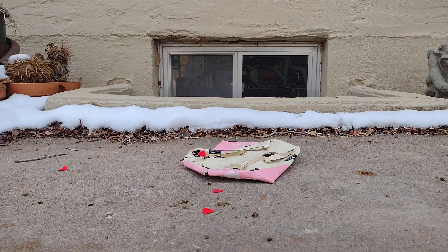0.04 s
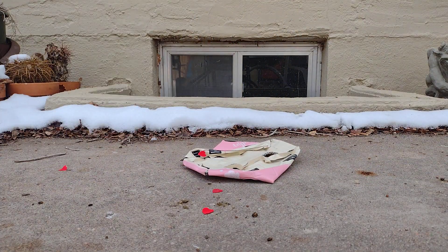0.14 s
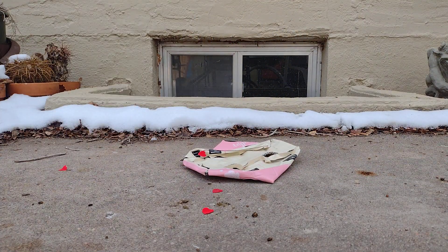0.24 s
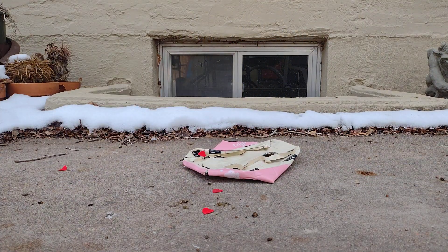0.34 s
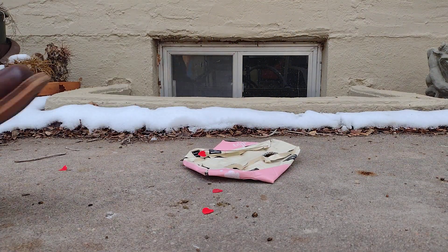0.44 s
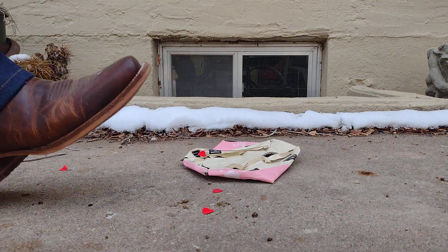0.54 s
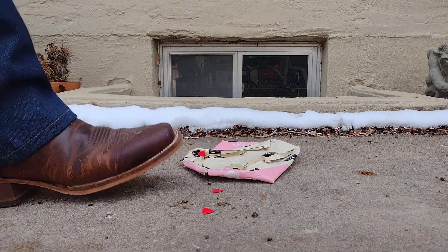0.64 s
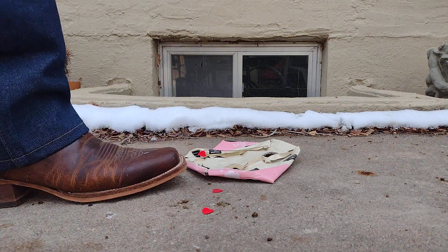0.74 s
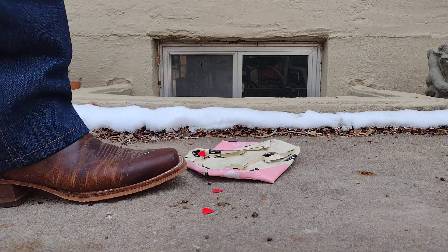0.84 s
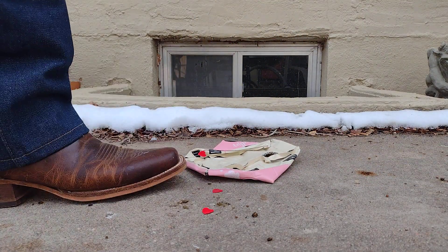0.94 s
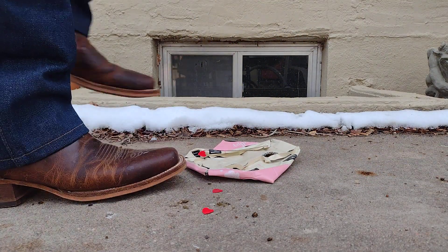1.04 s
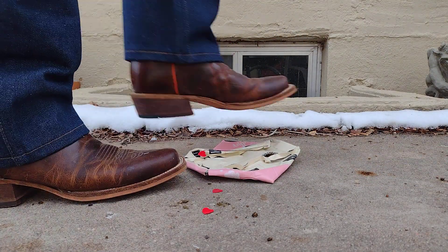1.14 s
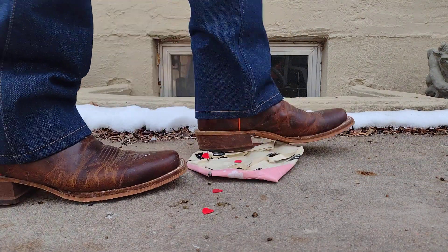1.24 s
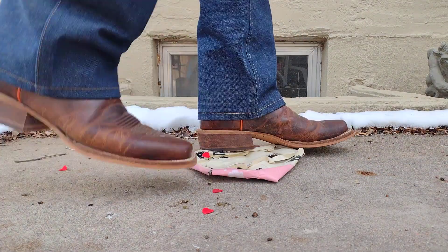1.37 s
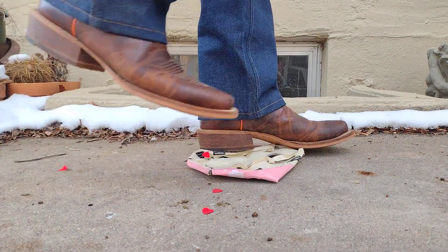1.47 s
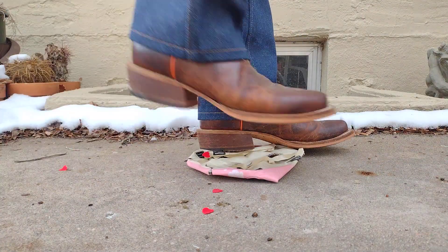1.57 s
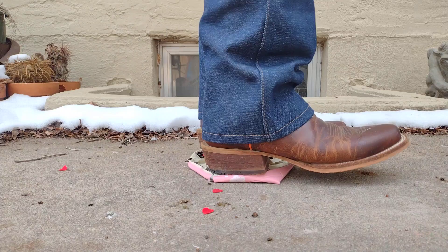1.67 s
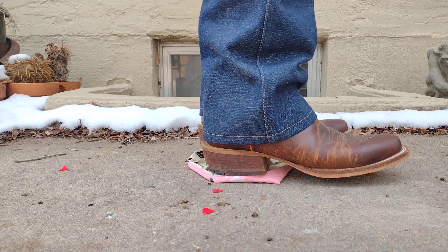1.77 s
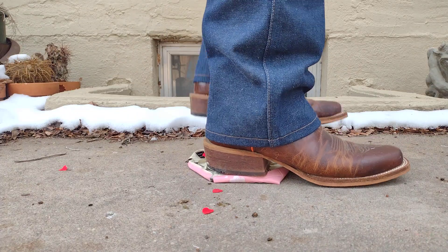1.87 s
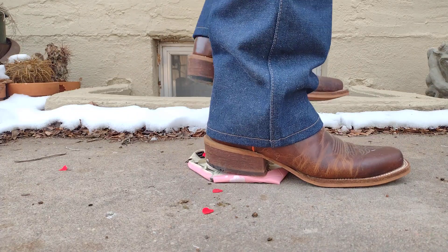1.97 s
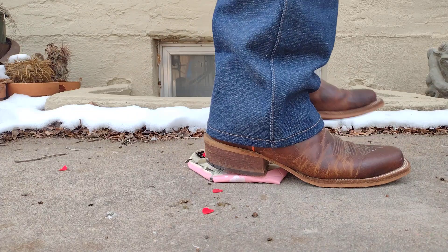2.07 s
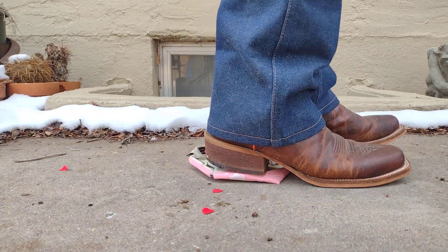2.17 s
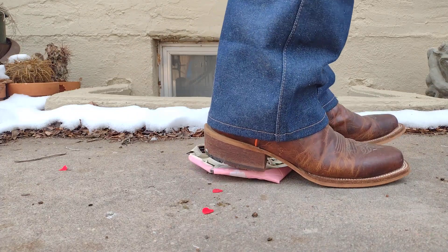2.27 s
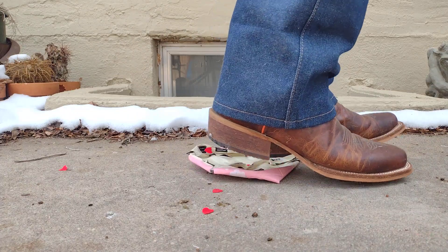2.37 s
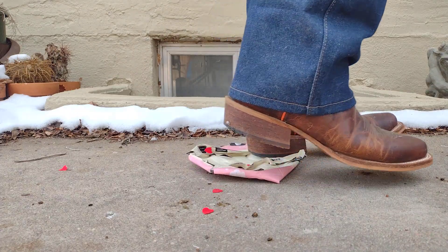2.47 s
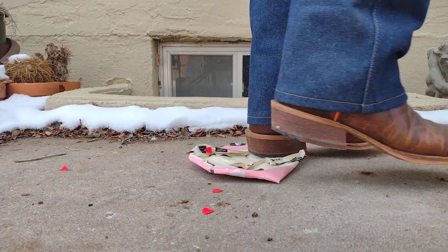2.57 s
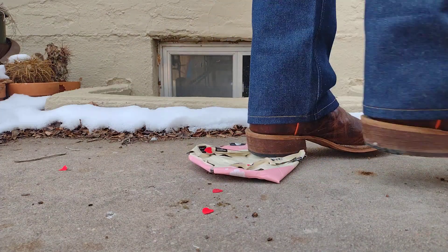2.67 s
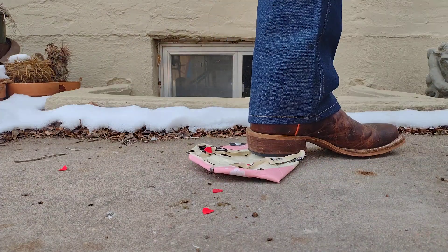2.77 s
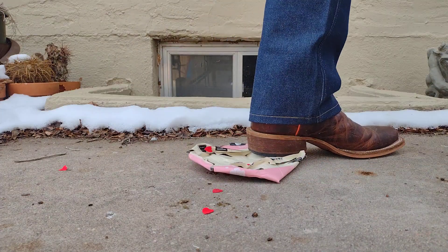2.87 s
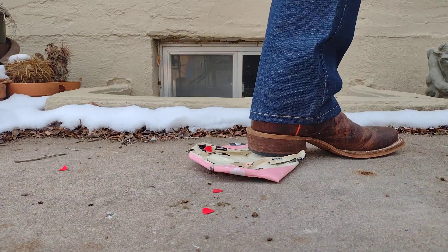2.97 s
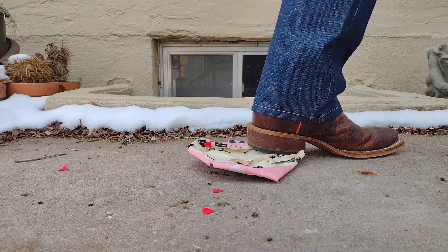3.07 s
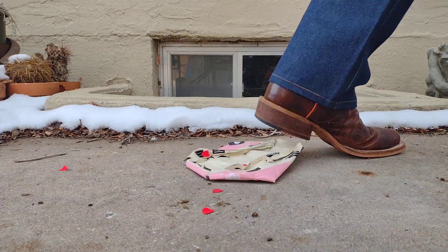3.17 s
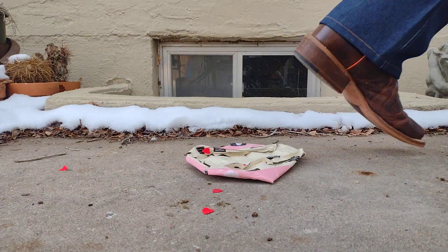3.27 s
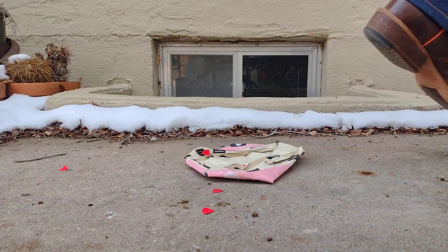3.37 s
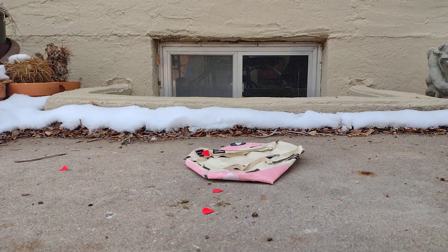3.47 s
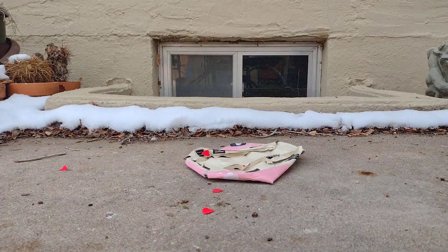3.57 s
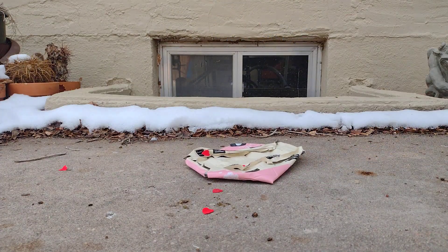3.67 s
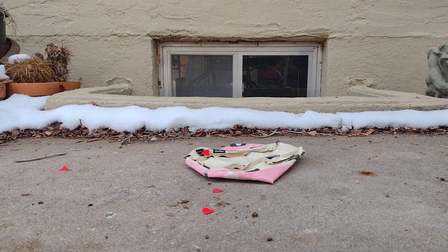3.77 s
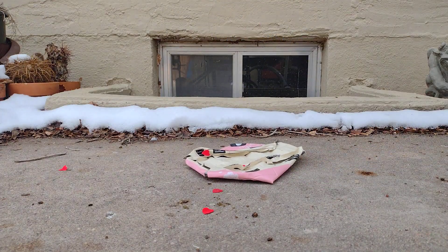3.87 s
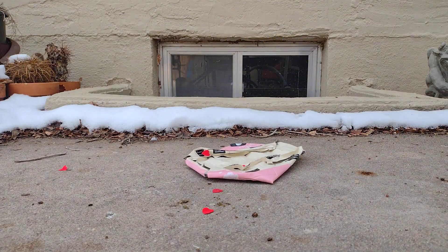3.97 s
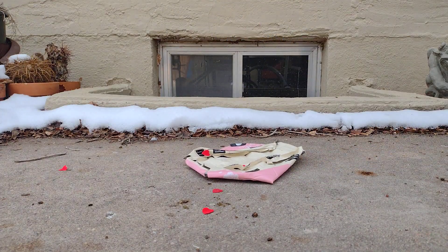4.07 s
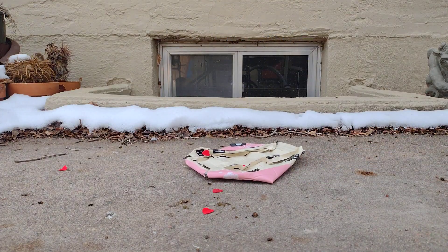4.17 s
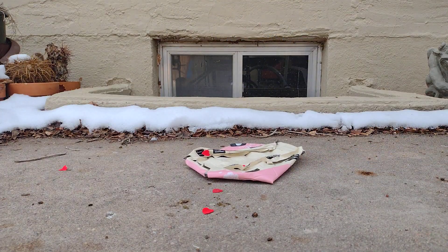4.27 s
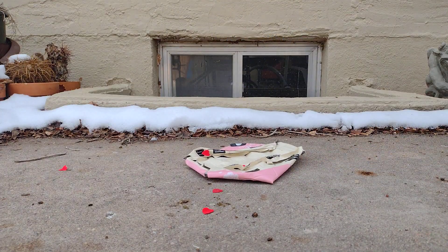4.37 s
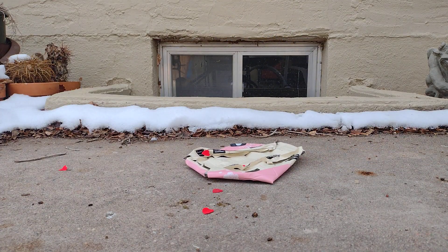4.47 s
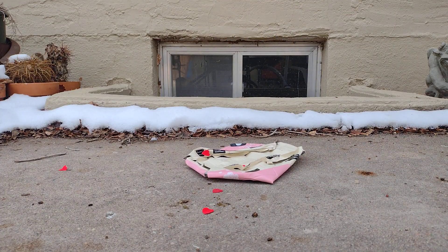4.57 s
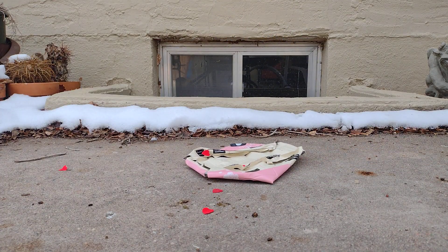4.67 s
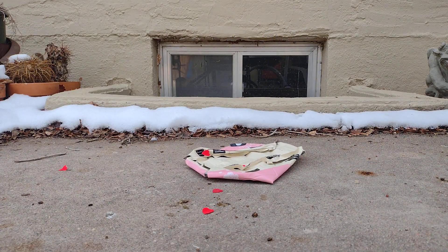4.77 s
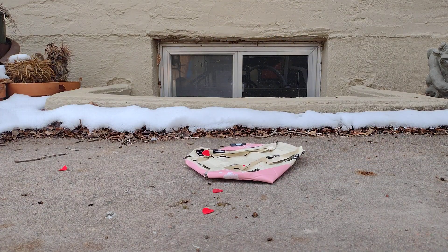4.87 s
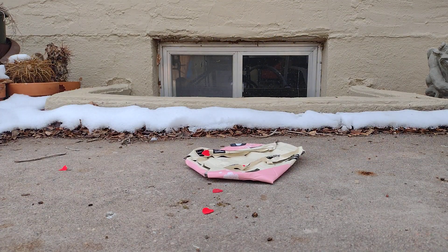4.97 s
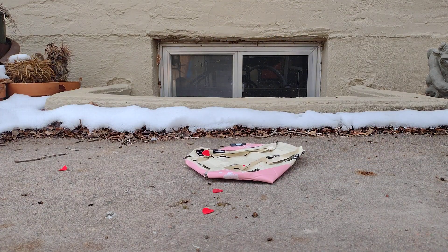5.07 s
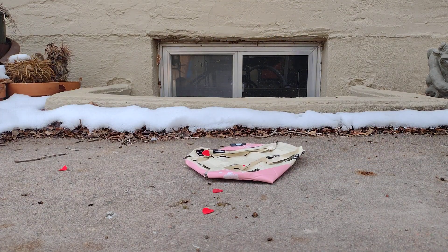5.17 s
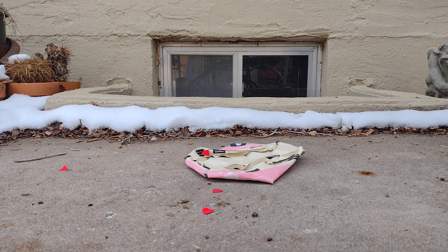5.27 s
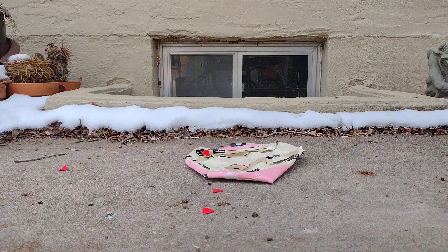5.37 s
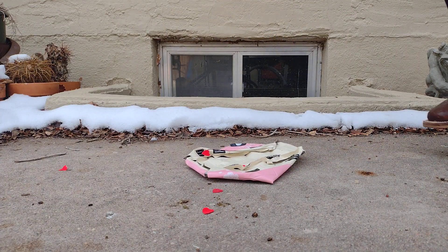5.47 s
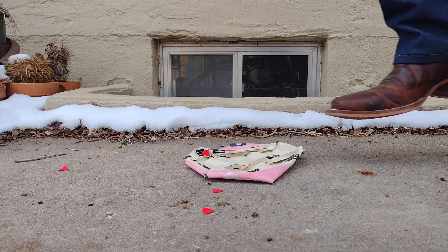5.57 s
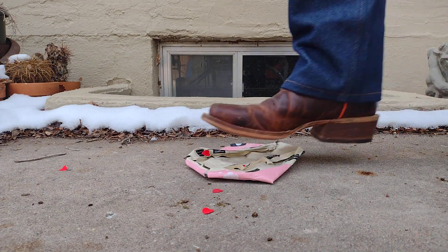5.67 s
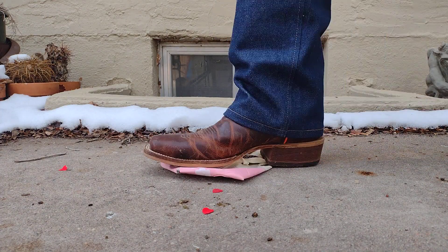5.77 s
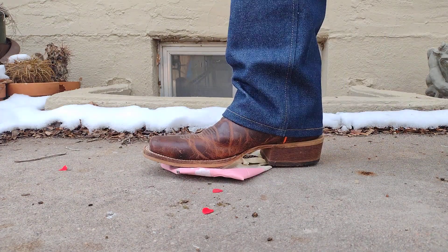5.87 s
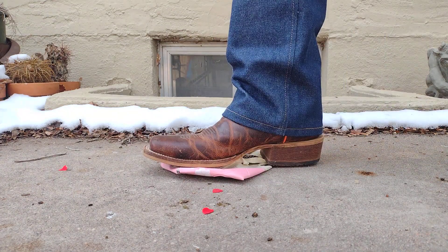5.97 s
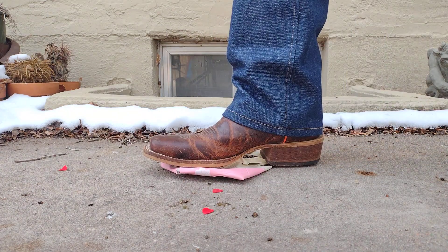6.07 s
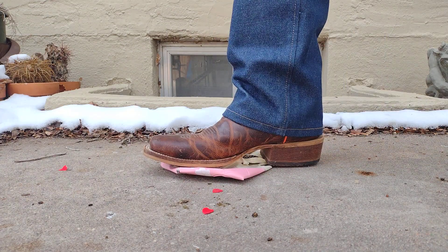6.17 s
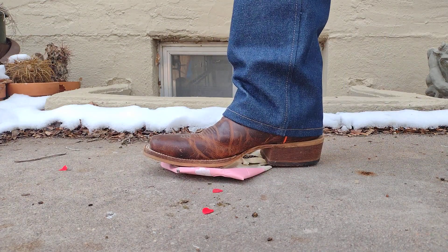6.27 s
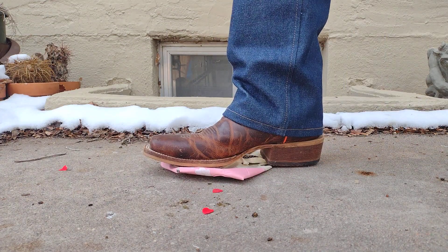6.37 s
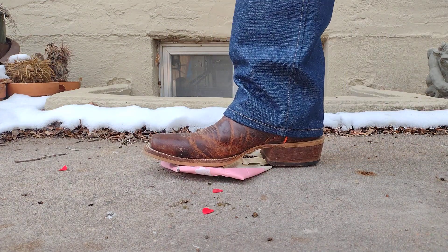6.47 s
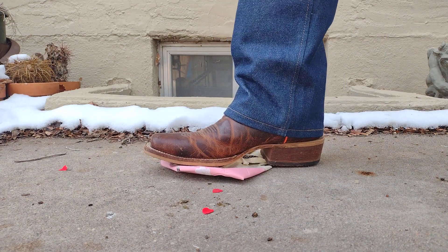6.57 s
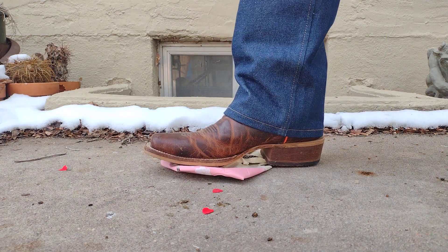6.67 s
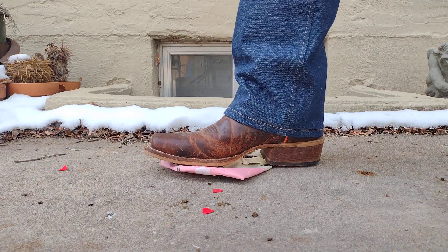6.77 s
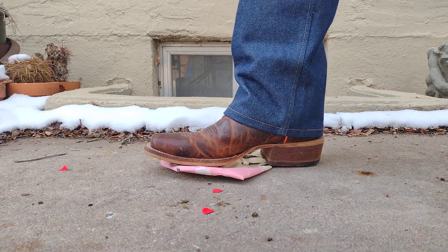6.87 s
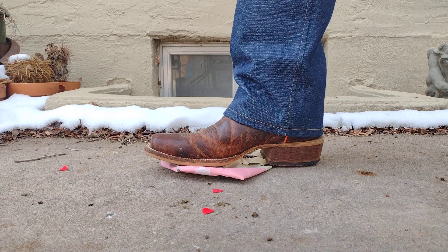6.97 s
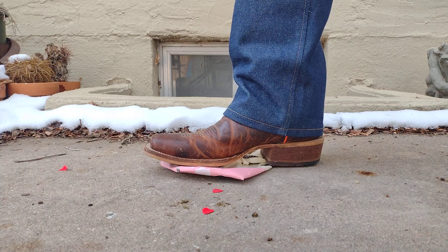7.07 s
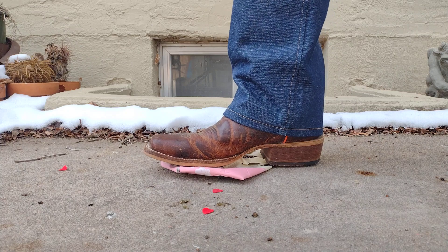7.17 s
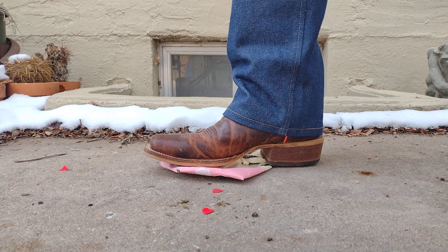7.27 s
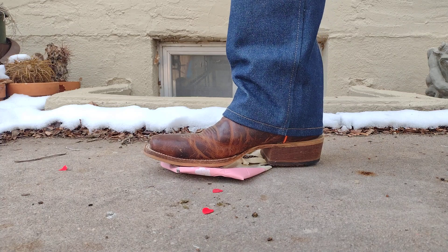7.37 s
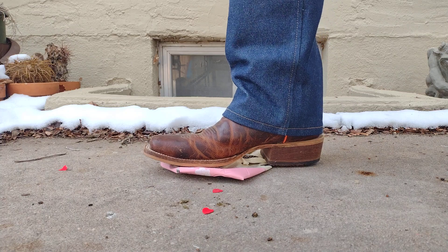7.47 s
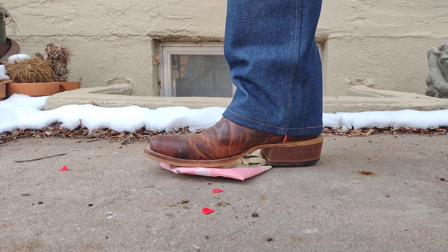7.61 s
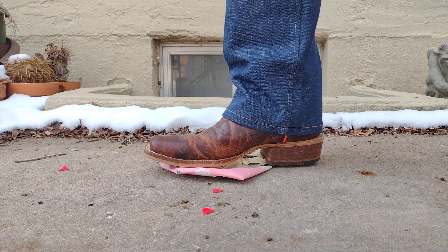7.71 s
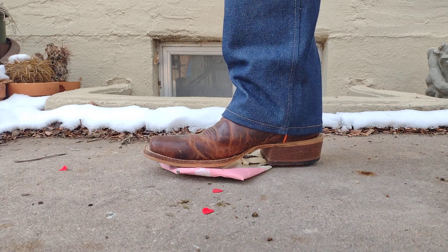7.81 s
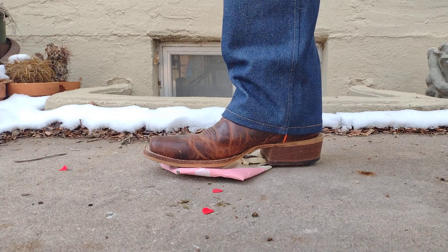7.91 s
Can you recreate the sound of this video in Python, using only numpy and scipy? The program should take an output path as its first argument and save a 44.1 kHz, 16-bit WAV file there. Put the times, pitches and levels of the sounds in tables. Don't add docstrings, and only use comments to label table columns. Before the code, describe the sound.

A close outdoor scene on concrete beside a house, with a short wall echo. Distant traffic rumble is strongest for the first quarter second, then drops and stays faint, with thin hiss. Light grit ticks open it; a heel thuds at 0.7 s. At 1.3 s a boot stamps thin tin: a dense, very loud cluster of metallic clacks and crunches lasting about a tenth of a second. Another sharp clack hits at 1.75 s, with small creaks and snaps to 2.0, and a third crunching stamp at 2.2. From 3.15 to 3.7 s the freed sheet rattles and springs in quick, lighter clacks, fading by 3.85. Quiet scrapes and soft distant steps occur around 4.1, 4.6 and 5.3. At 5.83 s a final heavy stamp thumps and crushes the tin, creaking briefly. A dull heel tap comes at 6.34, then only sparse grit ticks until nearly 8 s.

```python
import sys
import numpy as np
from scipy import signal
from scipy.fft import rfft, irfft, next_fast_len
from scipy.io import wavfile
from scipy.ndimage import uniform_filter1d, map_coordinates

SR = 44100
rng = np.random.default_rng(int(sys.argv[2]) if len(sys.argv) > 2 else 0)


def boost(x):
    u = np.asarray(x, float) / 20
    return 10 ** u


def store_wav(level_fs):
    pcm = np.round(np.clip(np.atleast_2d(level_fs), -1, 1) * 32767)
    wavfile.write(sys.argv[1], SR, pcm.T.astype(np.int16))


N = 350286


def unit(x):
    return x / np.sqrt(np.mean(x ** 2) + 1e-20)


def along(points, hz):
    f, v = np.transpose(points)
    return np.interp(np.log(hz + 1), np.log(f + 1), v)


def filtered(x, response):
    m = next_fast_len(x.shape[-1] + 2048)
    return irfft(rfft(x, m) * response(np.fft.rfftfreq(m, 1 / SR)), m)[..., :x.shape[-1]]


def resonance(f, hz, width_hz):
    return 1j * f * width_hz / (hz * hz - f * f + 1j * f * width_hz)


def wobble(rate):
    knots = rng.standard_normal(int(N * rate / SR) + 4)
    return map_coordinates(knots, [np.arange(N) * rate / SR])


def spread(pair, alike):
    def mid_side(hz):
        turn = np.arccos(np.clip(along(alike, hz), -1, 1)) / 2
        return np.array([np.cos(turn), np.sin(turn)])

    mid, side = filtered(pair, mid_side)
    return np.array([mid + side, mid - side])


def coloured(length, spectrum):
    white = rng.standard_normal((2, length))
    return unit(filtered(white, lambda f: boost(along(spectrum, f))))


def add(out, s, sound):
    out[:, round(s * SR):][:, :sound.shape[1]] += sound


# (time [s], rumble level [dB])
STREET_LEVEL = [(0, -41.5), (.18, -41), (.26, -52.5), (0.8, -51.5), (1.7, -54.5), (2.1, -58.5), (2.4, -57),
                (2.8, -61), (3.2, -53), (3.8, -57.5), (4.3, -63), (5.0, -62.5), (5.4, -59), (6.1, -58.5),
                (6.35, -61), (6.6, -63.5), (7.94, -65)]
# (frequency [Hz], density [dB per Hz])
RUMBLE_SPECTRUM = [(12, -60), (37, -18), (114, 1.5), (220, -4.5), (370, -10), (450, -16), (900, -24),
                   (1500, -76)]
# (frequency [Hz], density [dB per Hz])
TYRE_SPECTRUM = [(250, -30.5), (400, -6), (800, -8.5), (1300, -11), (1700, -18), (2600, -28), (6000, -60)]
# (frequency [Hz], density [dB per Hz])
HISS_SPECTRUM = [(590, -32.5), (1000, -11.5), (1510, -31), (1610, -7), (3370, -2.5), (4210, -6),
                 (15100, -16.5), (16300, -27.5)]
# (frequency [Hz], left-right likeness [0-1])
FAR_LIKENESS = [(25, 0.4), (70, .75), (180, 1), (550, 0.14), (1650, 0.29), (15000, 0.21)]
# (time [s], delay of the left side [samples])
PASSING_DELAY = [(0, -20), (1.2, -20), (3.5, 16), (7.94, 16)]


def street():
    n = np.arange(N)
    level_db = np.interp(n / SR, *np.transpose(STREET_LEVEL))
    slow_db = uniform_filter1d(level_db, size=SR // 2)
    lumps = boost(2.3 * wobble(10) + 1.0 * wobble(25))
    rumble = boost(level_db) * unit(lumps * coloured(N, RUMBLE_SPECTRUM))
    tyres = boost(0.56 * slow_db - 35) * coloured(N, TYRE_SPECTRUM)
    left, right = spread(rumble + tyres, FAR_LIKENESS)
    delay = np.interp(n / SR, *np.transpose(PASSING_DELAY))
    late_left = np.interp(n - delay, n, left)
    hiss_level = boost(-76 - .1 * (slow_db + 60) + 1.2 * wobble(3))
    return np.array([late_left, right]) + hiss_level * spread(coloured(N, HISS_SPECTRUM), FAR_LIKENESS)


# (frequency [Hz], t60 [s])
WALL_DECAY = [(150, .3), (1500, .28), (5000, .2), (14000, .14)]


def wall(x):
    hz, t, z = signal.stft(rng.standard_normal((2, SR // 2)), SR, nperseg=256)
    decay = boost(-60 * t / along(WALL_DECAY, hz)[:, None])
    tail = signal.istft(z * decay, SR, nperseg=256)[1]
    late = np.pad(x, ((0, 0), (220, 0)))
    return signal.fftconvolve(late, tail / np.linalg.norm(tail[0]), axes=1)[:, :N]


# (time [s], peak level [dB], pitch [Hz], murmur level [dB])
HEEL_THUDS = [(0.6964, -21, 366, -13), (1.318, -25.5, 292, -4), (1.336, -17.5, 520, -16),
              (1.76, -21.5, 200, -9), (1.956, -31, 190, -14), (2.228, -19.5, 200, -8),
              (2.229, -18, 780, -19), (3.0703, -19, 279, -19), (3.26, -46, 450, -6), (3.88, -46, 307, -5.5),
              (3.93, -44.5, 149, -16), (4.585, -50.5, 199, -8.5), (4.652, -41.5, 200, -8.5),
              (5.27, -33, 345, -13), (5.311, -40.5, 166, -11.5), (5.5, -47.5, 160, -6),
              (5.83, -19, 380, -8), (5.848, -14.5, 398, -14), (5.865, -17.5, 600, -14),
              (6.3432, -21, 221.5, -23.5), (7.41, -47.5, 170, -12), (7.451, -49.5, 149, -14)]


def thuds():
    out = np.zeros((2, N + SR))
    lead_s = .02
    t = np.arange(SR // 3) / SR - lead_s

    def dull(f):
        slab = resonance(f, 150, 120) + 1.1 * resonance(f, 360, 280)
        return slab * resonance(f, 150, 450) ** 2

    for s, db, hz, murmur_db in HEEL_THUDS:
        cycles = .3 + .0014 * hz
        push = np.cos(2 * np.pi * hz * t) * np.exp(-(t * hz / cycles) ** 2)
        t60_s = .33 + .005 * db
        fade = (t > 0) * boost(murmur_db - 60 * t / t60_s)
        murmur = filtered(fade * 7.3 * rng.standard_normal(len(t)), dull)
        add(out, s - lead_s, boost(db) * (push + murmur)[None])
    return out[:, :N]


# (frequency [Hz], width [Hz], level [dB])
SHEET_PANELS = [(1283, 210, -16.5), (1700, 32, -1.5), (1820, 11, -6.5), (2470, 51, -7.5), (2620, 28, -11),
                (3070, 130, 3.5), (3710, 130, -10.5), (3960, 190, -12), (4460, 22, -10), (5160, 37, -15.5)]


def panels(hz, width_hz, freed=1.5, facets=.6):
    share = boost(rng.normal(-6.5, 5, len(SHEET_PANELS)))
    facet_hz = np.exp(rng.uniform(np.log(2500), np.log(12000), 7))

    def ring(f):
        total = .5 + freed * resonance(f, hz, width_hz)
        for k, (centre, width, db) in enumerate(SHEET_PANELS):
            total = total + (-1) ** k * share[k] * boost(db) * resonance(f, centre, width + 30)
        return total + facets * sum(resonance(f, centre, 200) for centre in facet_hz)

    return ring


# (frequency [Hz], density [dB per Hz])
BODY_SPECTRUM = [(350, -51), (750, -19), (1000, -11.5), (1300, -6.5), (2100, -8), (3000, -10.5),
                 (4000, -13.5), (5500, -40)]
# (frequency [Hz], density [dB per Hz])
EDGE_SPECTRUM = [(1700, -35.5), (2800, -12), (4500, -4), (8200, -4.5), (10600, -9.5), (14900, -11),
                 (16000, -23.5)]


def tin_noise(length):
    return coloured(length, BODY_SPECTRUM), coloured(length, EDGE_SPECTRUM)


# (frequency [Hz], left-right likeness [0-1])
NEAR_LIKENESS = [(200, 1), (1000, .8), (2000, .55), (4000, .05), (12000, .05)]


def nearby(pair):
    return spread(pair, NEAR_LIKENESS)


# (start [s], held [s], level [dB], brightness [dB], t60 [s])
WEIGHT_CRUSH = [
    (1.313, .018, -18.5, -4.5, .19),
    (1.361, .032, -31.5, 3.5, .2),
    (1.742, .008, -48, -8.5, .03),
    (1.75, .011, -27, 10.5, .023),
    (1.857, .007, -33.5, -6, .13),
    (2.213, .008, -50, 2, .03),
    (2.22, .011, -17, -1.5, .1),
    (5.8255, .042, -17, 0, .069),
    (5.875, .06, -39, -4.5, .15),
]
# (start [s], held [s], level [dB],
# brightness [dB], panel or squeak pitch [Hz])
CREAKS = [(1.765, .04, -36, -9, 2200), (1.77, .07, -37, -19, 1320), (1.96, .03, -56, -10.5, 1394),
          (2.24, .022, -47, -8, 2010), (2.29, .04, -44.5, -6.5, 1830), (3.165, .025, -48, -4.5, 2500),
          (3.248, .023, -38.5, -11, 1390), (3.351, .13, -42, -6, 1830), (3.56, .064, -51, -24, 1500),
          (3.701, .096, -62, -8.5, 1480), (3.85, .028, -54.5, -11.5, 1825), (5.94, .039, -48, -11, 2300),
          (5.36, .11, -72, -18, 3050)]
# (start [s], held [s], level [dB])
SOLE_SCUFFS = [
    (0, .18, -72),
    (.72, .1, -71),
    (.82, .09, -67),
    (3.1, .05, -63.5),
    (4.0, .1, -72),
    (4.109, .07, -62),
    (5.269, .043, -64),
    (5.4, .1, -77),
]


def crush():
    out = np.zeros((2, N + SR))
    t = np.arange(round(.4 * SR)) / SR
    grains = np.pad(unit(boost(2.5 * wobble(300))), (0, SR))
    landing_hz = 1500
    loads = [(*row, landing_hz, .7) for row in WEIGHT_CRUSH]
    loads += [(*row, .3, hz, 2.6) for *row, hz in CREAKS]
    loads += [(*row, -3, .19, landing_hz, .1) for row in SOLE_SCUFFS]
    for s, held_s, db, bright_db, t60_s, hz, freed in loads:
        load = np.clip(t / .0065, 0, 1) * boost(db - 60 * np.maximum(t - held_s, 0) / t60_s)
        load *= grains[round(s * SR):][:len(t)]
        ring = panels(hz, 190, freed=freed, facets=.16)
        body, edge = map(unit, filtered(np.array(tin_noise(len(t))), ring))
        add(out, s, nearby(load * (body + boost(bright_db) * edge)))
    return out[:, :N]


def snap(db, hz, bright_db, t60_s, rise_s):
    t = np.arange(SR // 8) / SR
    fade_db = -60 * t / t60_s
    burst = boost(fade_db) + .06 * boost(.4 * fade_db)
    burst *= np.clip(t / rise_s, 0, 1) ** 2
    sharp = burst * (1 + .51 * boost(7.5 * fade_db))
    popping = np.clip(-.12 * bright_db, 0, 3) * (hz < 2100)
    ring = panels(hz, 130, freed=1.5 + popping)
    body, edge = tin_noise(len(t))
    clack, crackle = filtered(np.array([burst * body, sharp * edge]), ring)
    clack = clack / np.abs(clack).max()
    crackle = crackle / np.abs(crackle).max()
    return nearby(boost(db) * (clack + boost(bright_db) * crackle))


# (time [s], peak level [dB], panel pitch [Hz], brightness [dB], t60 [s])
BIG_FOLDS = [(1.3185, -1.5, 2044, -10.5, .025), (1.323, -5.5, 1410, -19, .041),
             (1.334, -10.5, 1320, -25, .067), (1.3437, -1.5, 3140, .5, .025), (1.351, -7, 1700, -13.5, .06),
             (1.373, -11, 1330, -16.5, .054), (1.393, -8.5, 3530, 8, .042), (1.4361, -37.5, 3470, 20, .039),
             (1.7564, -2, 1310, -5, .026), (1.786, -19, 2180, -12, .039), (2.2245, -4, 2980, -2, .037),
             (2.230, -3.5, 1490, -9, .025), (2.344, -16.5, 1380, 0, .046), (5.829, -3.5, 1125, -19.5, .037),
             (5.840, -5.5, 1850, -1, .074), (5.849, -9, 2520, -5.5, .069), (5.866, -8, 1240, -3.5, .035)]
# (time [s], peak level [dB], pitch [Hz],
# brightness [dB])
SMALL_SNAPS = [(0.6948, -50, 1210, -15), (1.5674, -36.5, 1126, -30), (1.8705, -28, 1330, -4),
               (1.9045, -26.5, 1324, -12), (1.935, -30, 1380, -6.5), (1.962, -47, 1403, 3.5),
               (2.0063, -40.5, 1390, -31.5), (2.2794, -27, 1150, -18), (2.2954, -32, 3500, -6),
               (2.8653, -46.5, 3640, -.5), (2.9068, -45.5, 3850, .5), (4.1102, -54, 1720, -12),
               (4.1935, -47.5, 3750, -17), (4.6434, -49, 2440, -12), (4.666, -44, 1820, -6.5),
               (4.9294, -62, 2160, -8), (5.1444, -66, 2590, -14), (5.1774, -63, 2660, -14),
               (7.3394, -65, 3700, -6), (7.7594, -65, 2990, -5), (5.2697, -54.5, 3500, -2.5),
               (5.304, -53.5, 2820, -17.5), (6.0309, -35, 1155, -34), (6.061, -57, 1186, -1.5),
               (6.3435, -50.5, 1027, -10.5)]
# (time [s], peak level [dB], panel pitch [Hz], brightness [dB])
TIN_RATTLE = [(3.1593, -36, 2680, -6), (3.1778, -44, 2950, 6.5), (3.198, -33.5, 3180, .5),
              (3.254, -32, 1760, -17), (3.2671, -28, 1380, -18.5), (3.3315, -22.5, 1480, -10),
              (3.3665, -28.5, 1760, -12), (3.387, -22, 1400, -13), (3.4245, -17.5, 1450, -7),
              (3.4735, -24, 1740, -11.5), (3.5105, -29, 3200, -9), (3.5478, -24.5, 2030, -15.5),
              (3.6061, -32, 2030, -2), (3.6294, -34.5, 1840, -16), (3.6676, -38, 1370, -8.5),
              (3.7197, -56, 1300, -21), (3.7925, -54.5, 1460, -8.5), (3.8292, -41.5, 2210, -11.5),
              (3.8444, -37, 1974, -8.5)]
# (time [s], peak level [dB], brightness [dB])
GRIT_TICKS = [(0.0338, -54, -12), (0.0544, -58, -8), (0.1296, -55, -18), (0.1664, -61, -10),
              (0.4644, -64, -14), (0.4944, -60, -18), (0.7512, -54, -9), (0.837, -56, -10),
              (0.8849, -56, 1), (1.5894, -53, 1), (1.6024, -53, 2), (1.6614, -60, -6), (2.0827, -59, 1),
              (2.5074, -62, -7), (2.7194, -62, -8), (4.8674, -58, -10), (4.8933, -57, -14),
              (5.0994, -63, -15), (6.3779, -55, -11), (6.4038, -53, -14), (6.4348, -55, -8),
              (6.4444, -59, -3), (6.4844, -61, -15), (6.5494, -63, -4), (6.7064, -59, -6),
              (6.9491, -53, -8), (6.9666, -50, -12), (7.2933, -58, -9), (7.5018, -52, -12),
              (7.8564, -64, 2)]
# (time [s], left-right difference [dB])
BOOT_BALANCE = [(0, 2.5), (1, 3), (1.6, -1), (3.2, 1), (4.5, -1.5), (6.4, -5), (7.94, 1.5)]


def snaps():
    out = np.zeros((2, N + SR))
    fold_rise_s, snap_rise_s, rock_rise_s = .0022, .00055, .0025
    for s, db, hz, bright_db, t60_s in BIG_FOLDS:
        add(out, s - fold_rise_s, snap(db, hz, bright_db, t60_s, fold_rise_s))
    pinned_t60_s, free_t60_s, grit_t60_s = .055, .07, .04
    small = [(*row, pinned_t60_s, snap_rise_s) for row in SMALL_SNAPS]
    small += [(*row, free_t60_s, rock_rise_s) for row in TIN_RATTLE]
    for s, db, bright_db in GRIT_TICKS:
        hz = np.exp(rng.uniform(np.log(1900), np.log(4000)))
        small.append((s, db, hz, bright_db, grit_t60_s, snap_rise_s))
    for s, db, hz, bright_db, t60_s, rise_s in small:
        balance_db = np.interp(s, *np.transpose(BOOT_BALANCE))
        side = boost(balance_db * np.array([[.5], [-.5]]))
        add(out, s - .001 - rise_s, side * snap(db + 2.0, hz, bright_db + 9.5, t60_s, rise_s))
    return out[:, :N]


def scene():
    near = snaps() + crush() + thuds()
    return street() + boost(-19) * wall(near) + near


def low_pass(x):
    return signal.sosfilt(signal.butter(12, 16490, fs=SR, output="sos"), x)


def record(dry):
    rounded = dry / (1 + np.abs(dry / .99) ** 8) ** (1 / 8)
    mix = filtered(rounded, lambda f: np.clip((16100 - f) / 400, 0, 1))
    return low_pass(mix)


dry = scene()
out = record(dry)
store_wav(out)
```